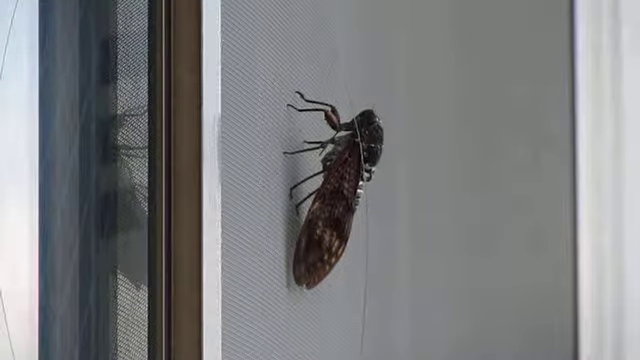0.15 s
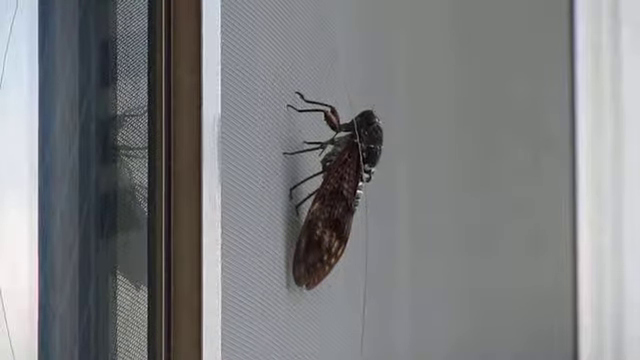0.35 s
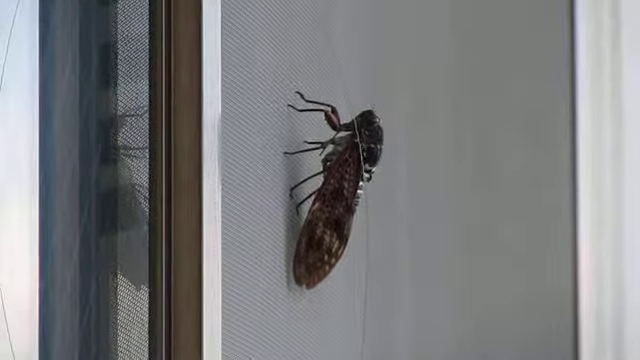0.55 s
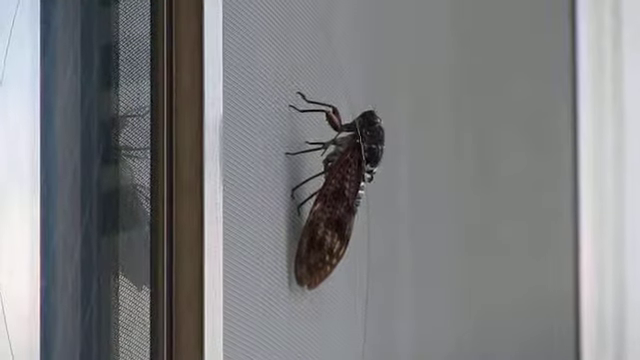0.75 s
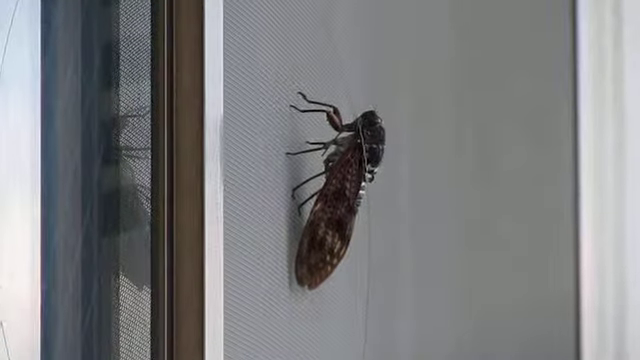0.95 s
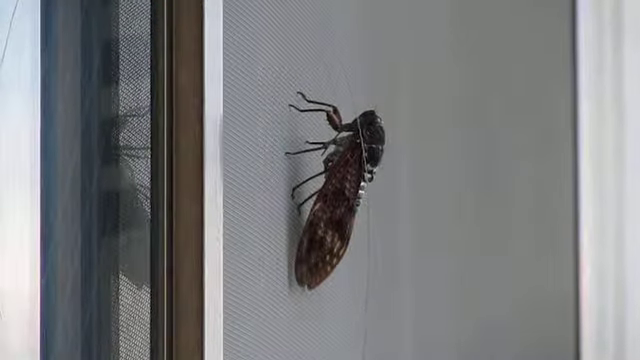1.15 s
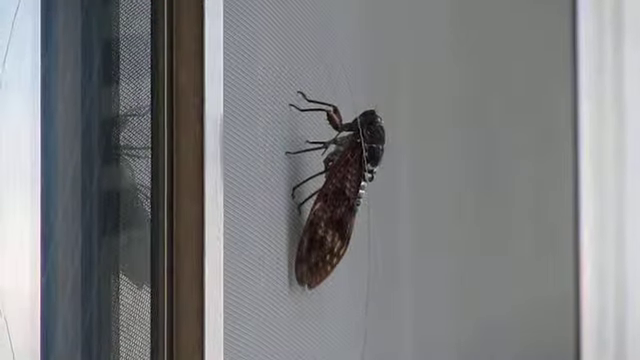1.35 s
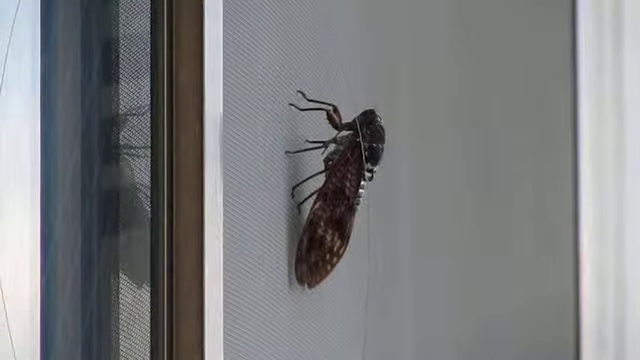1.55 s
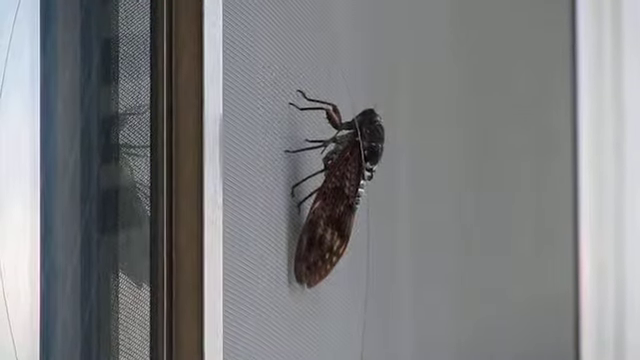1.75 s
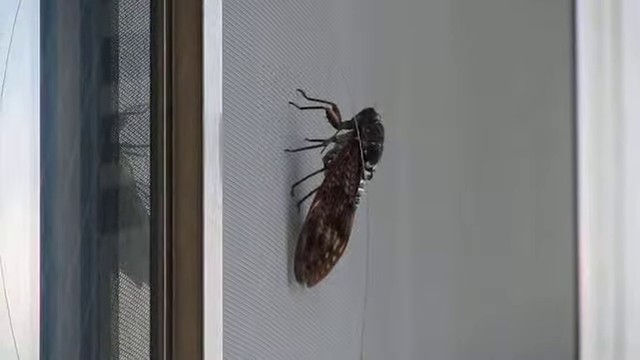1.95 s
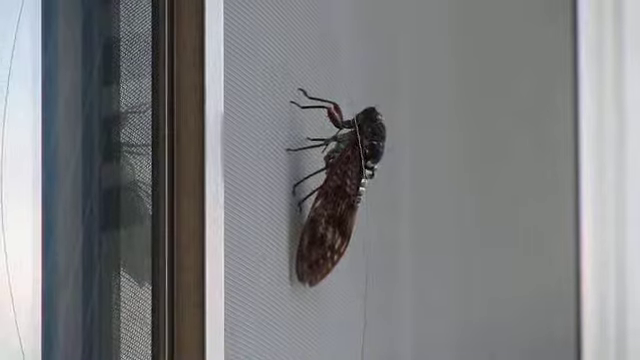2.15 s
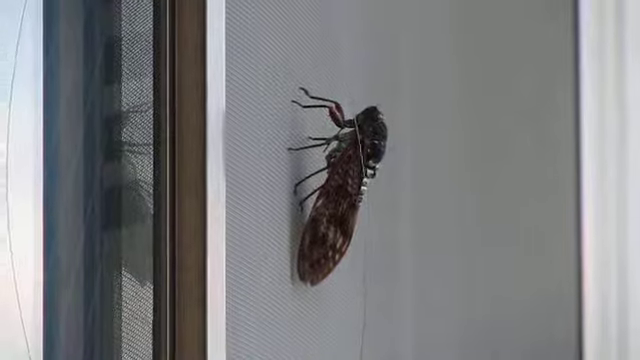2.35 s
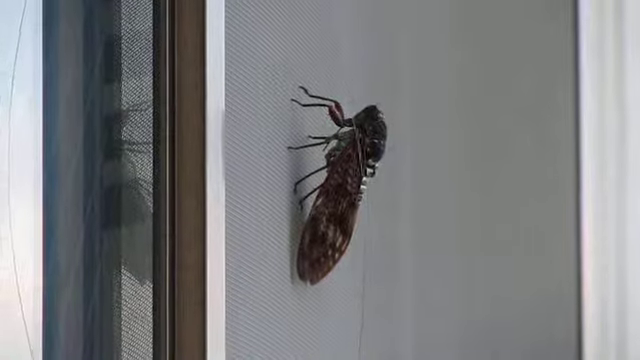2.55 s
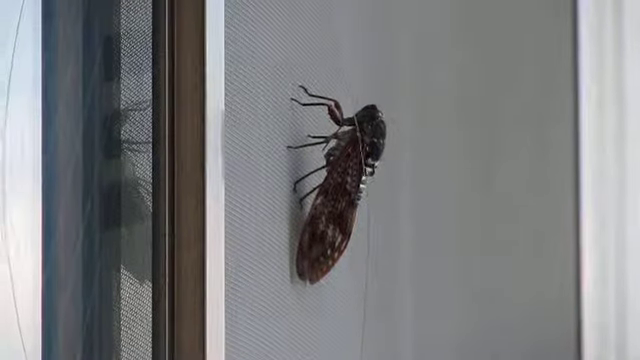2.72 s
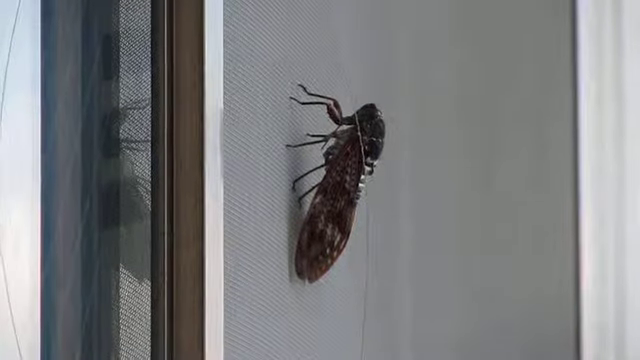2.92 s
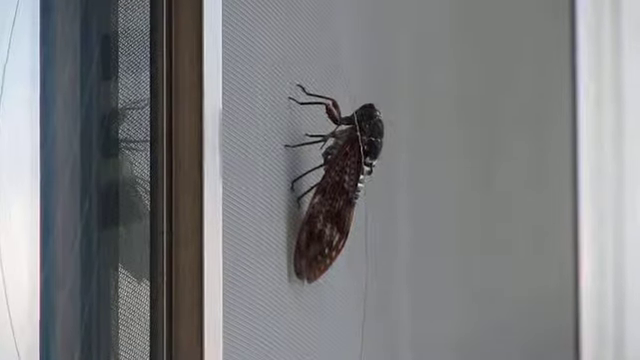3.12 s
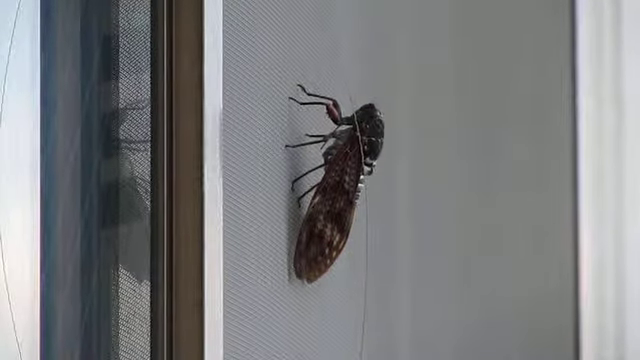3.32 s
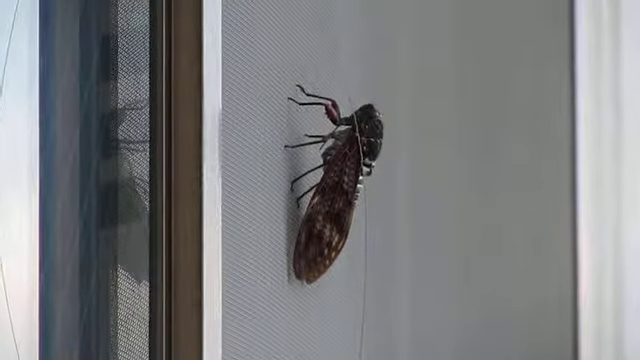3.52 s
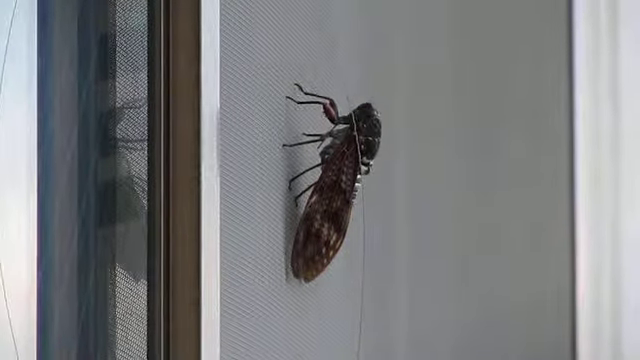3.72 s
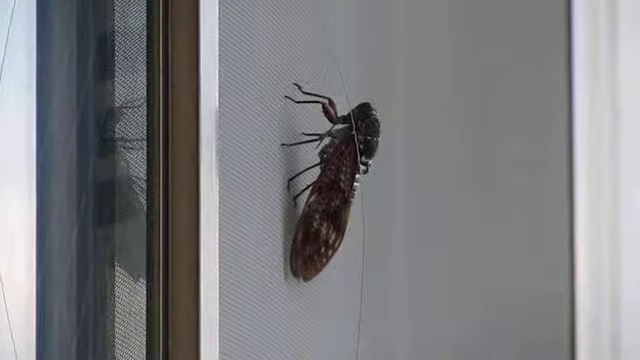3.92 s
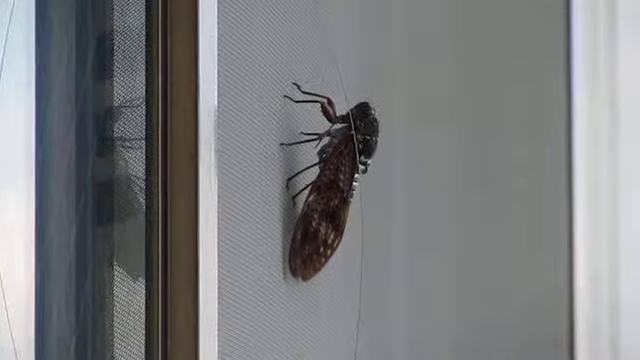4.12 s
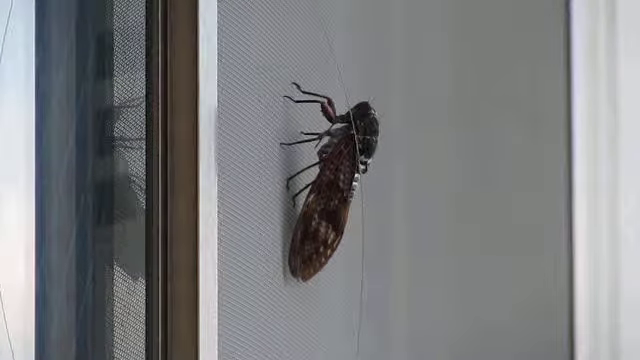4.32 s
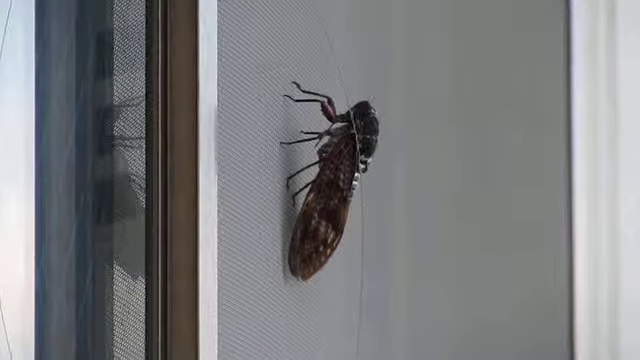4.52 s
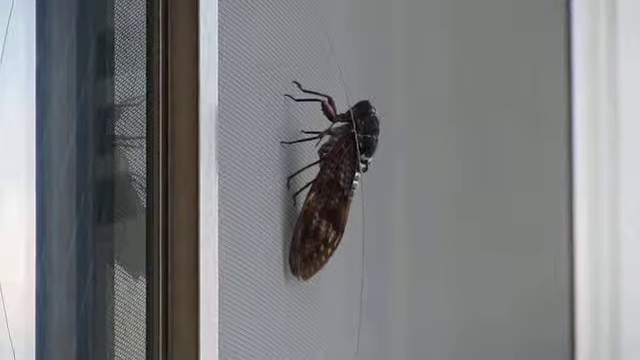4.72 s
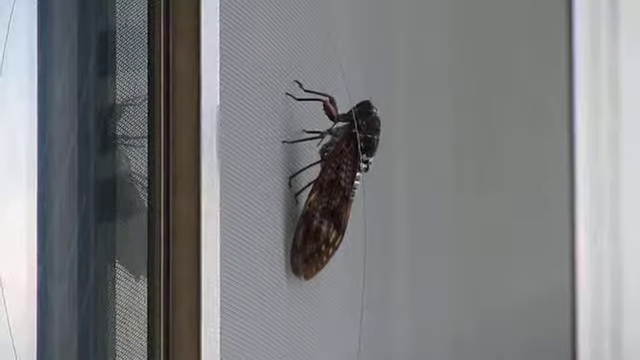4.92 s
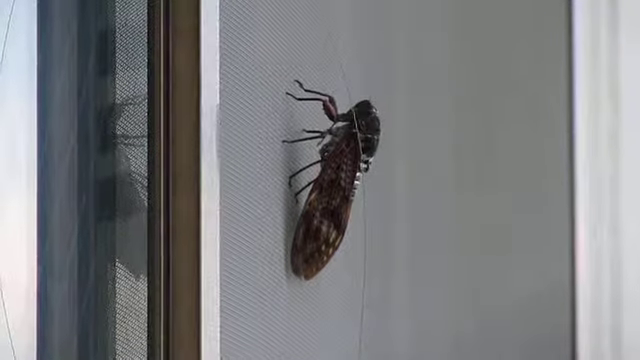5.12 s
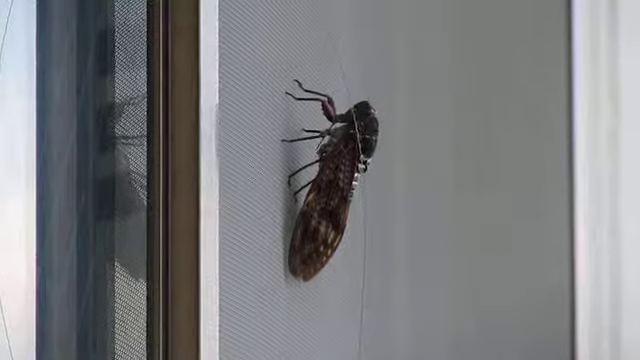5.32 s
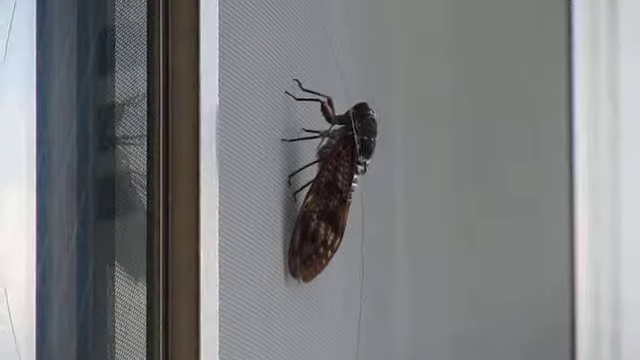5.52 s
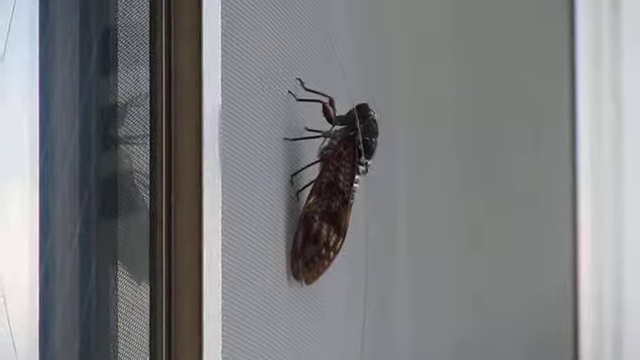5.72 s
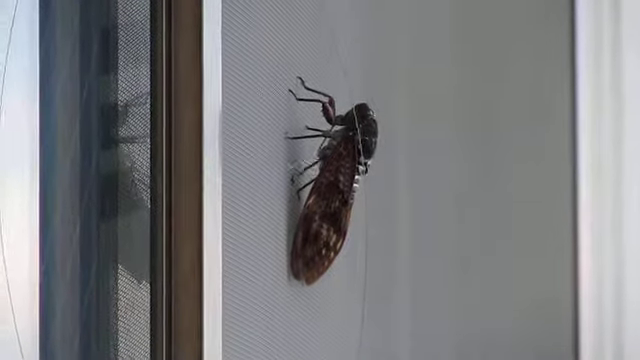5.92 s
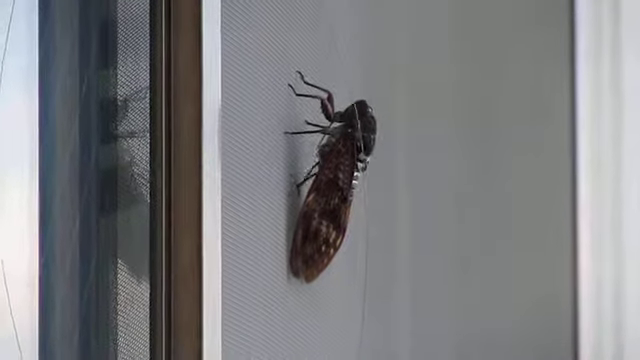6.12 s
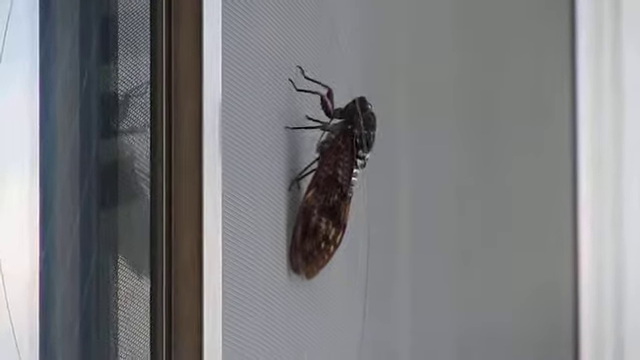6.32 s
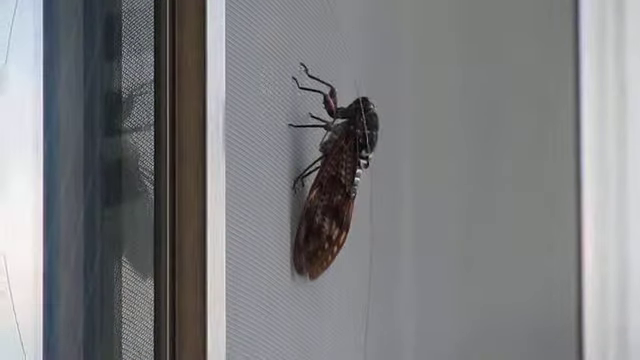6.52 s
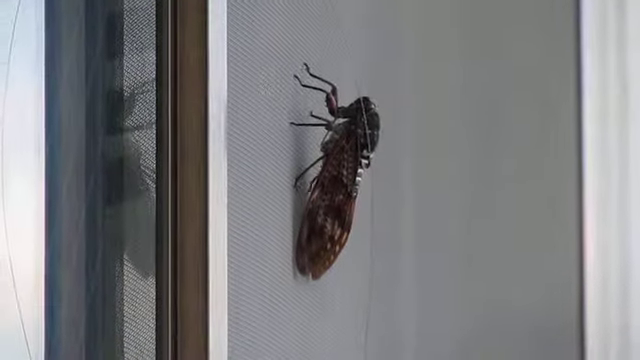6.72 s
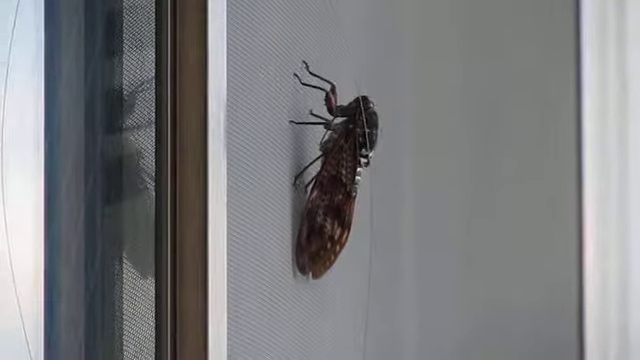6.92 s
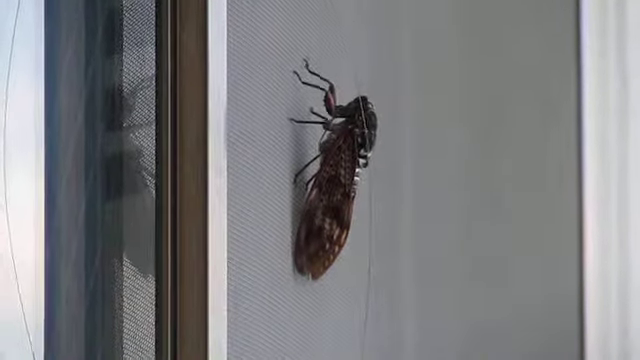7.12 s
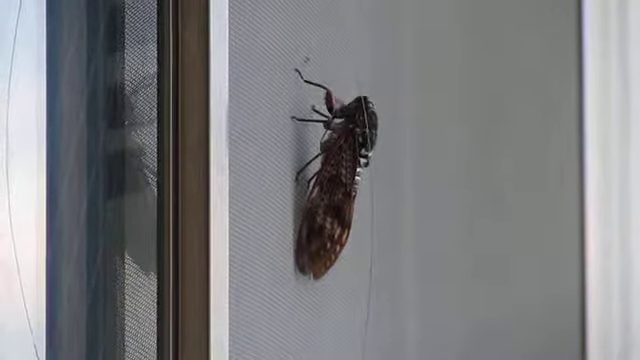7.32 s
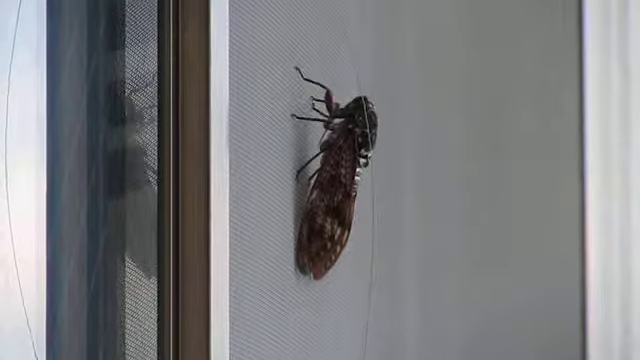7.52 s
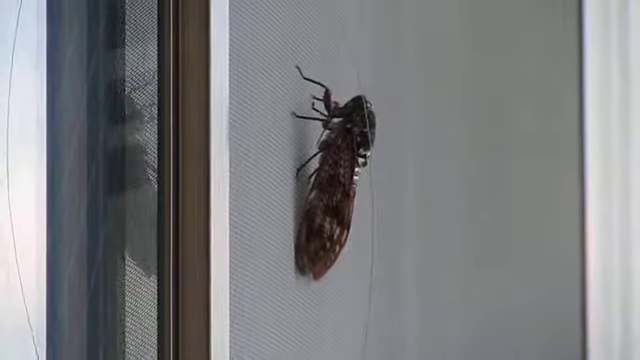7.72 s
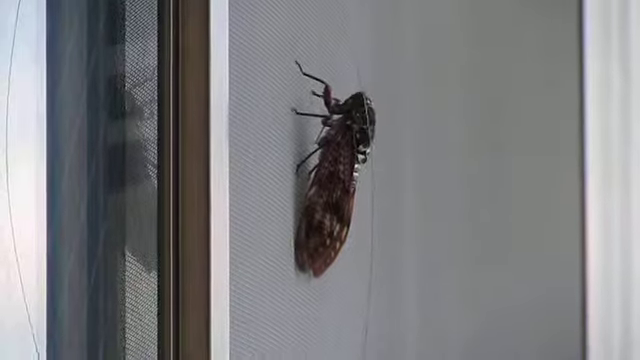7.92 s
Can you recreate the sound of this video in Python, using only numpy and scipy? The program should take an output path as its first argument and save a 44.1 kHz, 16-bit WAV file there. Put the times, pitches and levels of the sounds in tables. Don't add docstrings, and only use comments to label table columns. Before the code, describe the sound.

A cicada close by sings a dry, sizzling, rapidly pulsed buzz that gradually turns choppier and shorter over faint, distant traffic rumble.

```python
import sys
import numpy as np
from scipy import signal
from scipy.fft import rfft, irfft, next_fast_len
from scipy.io import wavfile
from scipy.ndimage import uniform_filter1d

SR = 44100
rng = np.random.default_rng(int(sys.argv[2]) if len(sys.argv) > 2 else 0)


def unload_audio(sound):
    columns = np.transpose(np.atleast_2d(sound))
    steps = np.round(np.clip(columns, -1, 1) * 32767)
    wavfile.write(sys.argv[1], SR, steps.astype(np.int16))


def ratio_of_db(decibels):
    return 10 ** (np.asarray(decibels, float) / 20)


N = 351036

# time_s, level_db
TRAFFIC_FLOW = [(0, -3), (.4, 0.3), (.95, -1.5), (1.5, 1.5), (2.3, .3), (3.3, .6), (4.1, -1), (4.9, 1.5),
                (5.05, -2), (6.7, -3), (7.96, -2)]
# frequency_hz, density_db_per_hz
THUD_SPECTRUM = [(12, -39), (20, -10), (130, -3), (170, -40), (290, -120)]
RUMBLE_SPECTRUM = [(76, -41), (130, -2.5), (220, 0.5), (440, -10.5), (570, -54), (970, -120)]
DRONE_SPECTRUM = [(260, -36), (450, -11), (534, 0.5), (614, -1.5), (694, -10), (780, -10), (1010, -25),
                  (1720, -120)]
HUM_SPECTRUM = [(440, -51), (750, -4.5), (1000, -2.5), (1100, -3), (1260, -6.5), (1900, -6.5), (2470, -15),
                (4180, -120)]
# frequency_hz, density_db_per_hz
HISS_SPECTRUM = [(900, -30), (1500, 0), (2400, -19), (3000, 15), (3800, -10), (4500, -3), (5600, -28),
                 (6800, -12), (8500, -28), (11000, -36), (12200, -50), (13000, -100)]
# level_db, share_of_flow_swing (0-1)
LAYER_LEVELS = [
    (-51.5, .2),
    (-44.5, 1.05),
    (-48.5, .1),
    (-55, .02),
    (-66.5, .02),
]
# centre_s, half_width_s, lift_db, layer_index
PASSES_BY = [
    (.05, .5, -4, 3),
    (3.3, .85, 5.8, 3),
    (3.3, .6, 3, 4),
    (1.4, .1, 3.5, 0),
    (1.66, .07, 5, 0),
    (2.9, .6, 2, 0),
    (6.95, .06, 8, 0),
    (7.35, .07, 6, 0),
]
# start_s, peak_db, pitch_hz
SOFT_KNOCK = [
    (5.0898, -27, 1250),
]
# time_s, level_db
WHISTLE_LEVEL = [
    (5.9, -66),
    (5.95, -55),
    (6.08, -57),
    (6.14, -63),
]
# centre_s, half_width_s, level_db, pitch_hz, slide_hz_per_s
FAR_PEEPS = [
    (2.75, .035, -55, 1000, 0),
    (4.3, .022, -57, 7600, -6000),
    (4.368, .01, -57, 7820, -6000),
    (4.415, .015, -54, 7400, -6000),
]
# delay_ms, gain
FRAME_ECHOES = [(.73, 0.15), (1.119, -0.14), (2.078, 0.065), (2.642, -0.0076), (3.058, -0.077),
                (3.352, 0.12), (4.441, -0.15), (4.76, -0.27)]
# pitch_hz, level_db
GLASS_MODES = [(4400, 1), (4512, 1), (4655, 1), (4780, -1), (4867, 2.5), (4964, 9.5), (5200, 1), (5290, 1),
               (5426, -0.5), (5551, 7), (5660, -3.5), (5780, -4.5), (5852, 5.5), (5935, 2.5), (6067, 0.5),
               (6180, 1.5), (6287, 5), (6400, -1), (6500, 3), (6585, -1), (6700, -2), (6830, 1),
               (7070, -11), (7350, 4.5)]
# centre_hz, width_hz, share_absorbed (0-1)
MESH_BANDS = [(2090, 130, .7), (2810, 120, .8), (3900, 250, .6), (5150, 110, .7)]
# frequency_hz, t60_s
PORCH_DECAY = [(2000, 0.066), (5300, 0.028), (8000, 0.029), (11000, 0.015)]
# first_s, last_s, count_bursts, growth_of_length_ms
BURST_RUNS = [(-.0059, .6174, 11, -4), (.6766, .8689, 4, -5), (.9253, 1.5446, 11, 0),
              (1.6108, 1.7306, 3, 1), (1.7964, 1.9796, 4, 5), (2.0475, 2.2885, 5, 4), (2.354, 2.79, 8, 2),
              (3.0113, 3.1862, 4, 5), (3.2483, 3.3079, 2, 6), (3.4904, 3.6602, 4, 5), (3.7213, 4.014, 6, 1),
              (4.1985, 4.3757, 4, -4), (4.5608, 4.6655, 3, 9), (4.8228, 4.8744, 2, 1),
              (4.9289, 5.2718, 7, 3), (5.326, 5.3814, 2, -2), (5.5436, 5.5952, 2, 10),
              (5.6552, 5.8197, 4, 5), (5.875, 5.9743, 3, 1.5), (6.1609, 6.4235, 6, 2.5),
              (6.4803, 6.6274, 4, 1.2), (6.8149, 7.0278, 5, 4), (7.0825, 7.2826, 5, .3),
              (7.4716, 7.5217, 2, .6), (7.5806, 7.8062, 5, -2), (7.86, 7.911, 2, 4)]
# start_s, length_ms, level_db, end_pitch_hz
SONG_BREAKS = [(2.8452, 6.8, -22, 5700), (2.864, 4.5, -23.5, 5700), (2.8904, 24.7, -22, 5800),
               (2.9346, 39.6, -20.5, 6120), (3.3669, 75, -21.5, 5850), (4.0503, 8.9, -22.5, 5600),
               (4.0789, 20.4, -20, 5770), (4.123, 7.2, -22.5, 5600), (4.1442, 9.4, -21, 5650),
               (4.407, 3.5, -21.5, 5610), (4.4414, 8.6, -20.5, 5700), (4.4927, 34, -21.5, 5720),
               (4.7083, 61, -22, 6170), (5.4084, 83.6, -22.5, 5690), (6.015, 11.4, -22, 5460),
               (6.038, 64, -21.5, 5910), (6.6693, 85, -22, 5720), (7.3203, 8.8, -25.5, 5670),
               (7.3426, 67, -22.5, 5920)]
# time_s, length_ms, level_db, end_pitch_hz
SONG_EFFORT = [(0, 30.5, -19, 6530), (.8, 27.5, -19.3, 6350), (1.6, 26, -20, 6200), (2.4, 23.5, -20, 5990),
               (3.2, 20.5, -20.6, 5820), (4.3, 17, -21.1, 5740), (4.9, 11.5, -21.6, 5590),
               (5.9, 10, -21.5, 5520), (7.1, 10.4, -22.3, 5440), (8, 10, -22, 5400)]
# time_s, right_tymbal_lag_ms, period_of_one_side_ms, rest_pitch_hz
MUSCLE_PACE = [(0, 3.48, 6.3, 5720), (1.5, 3.3, 6.13, 5790), (2.7, 4.3, 7.37, 5650), (3.8, 4.78, 8, 5370),
               (5, 5.25, 8.0, 5680), (6.5, 5.74, 8.4, 5442), (8, 4.94, 7.7, 5397)]
# pitch_over_rest_pitch (ratio), share_of_climb (0-1), level_db, t60_s, phase_rad
SAC_RINGS = [
    (.865, 0.41, -5, 0.0072, 0),
    (0.964, 0.56, -3.5, 0.0057, 0.094),
    (1.028, 1.02, -1, 0.0084, 2.436),
]
# pitch_hz, width_hz, level_db, sign
SHELL_MODES = [(2228, 128, -25.5, 0.94), (2487, 145, -21, -1.01), (2730, 110, -16, 0.76),
               (2930, 108, -18, -0.82), (3093, 100, -26.5, 0.48), (4540, 530, -21, 0.47),
               (6876, 830, -15.5, 0.95), (7165, 720, -18, -0.76), (9270, 3400, -25.5, 0.81),
               (10730, 3600, -26, -0.69)]
# frequency_hz, level_db
MICROPHONE_GAIN = [(1000, -17.5), (1900, -8.5), (2300, -1.5), (3700, -17), (4300, -13.5), (4700, -4),
                   (7500, -2), (11200, -15.5), (11900, -26.5), (12200, -35), (12500, -55)]

LONGER_HZ_PER_MS, LONGER_DB_PER_MS = 18, -.1
SCATTER_MS, SCATTER_DB, SCATTER_HZ = .5, .3, 30


def along(points, hz):
    f, value = np.transpose(points)
    return np.interp(np.log(hz + 1), np.log(f + 1), value)


def filtered(x, response):
    m = next_fast_len(N + 8192)
    return irfft(rfft(x, m) * response(np.fft.rfftfreq(m, 1 / SR)), m)[:N]


def mode(f, hz, width_hz):
    return 1j * f * width_hz / (hz * hz - f * f + 1j * f * width_hz)


def causal(points):
    def response(hz):
        cepstrum = irfft(np.log(ratio_of_db(along(points, hz))))
        cepstrum[1:len(hz) - 1] *= 2
        cepstrum[len(hz):] = 0
        return np.exp(rfft(cepstrum))
    return response


def place(s, size, shape, count):
    index = np.ceil(s * SR).astype(int)[:, None] + np.arange(count)
    wave = size[:, None] * shape(index / SR - s[:, None])
    inside = (index >= 0) & (index < N)
    return np.bincount(index[inside], wave[inside], N)


def rush(spectrum, patchy_db):
    z = signal.stft(rng.standard_normal(N), nperseg=512)[2]
    field = uniform_filter1d(rng.standard_normal(z.shape), 4, 0)
    field = uniform_filter1d(field, 12, 1)
    x = signal.istft(z * ratio_of_db(patchy_db * field / field.std()), nperseg=512)[1][:N]
    x = filtered(x, lambda hz: ratio_of_db(along(spectrum, hz)))
    return x / x.std()


def distance(t):
    flow_db = np.interp(t, *np.transpose(TRAFFIC_FLOW))
    levels_db = [db + share * flow_db for db, share in LAYER_LEVELS]
    for s, half_width, lift_db, layer in PASSES_BY:
        k = round(layer)
        levels_db[k] = levels_db[k] + lift_db * np.exp(-((t - s) / half_width) ** 2)
    spectra = (THUD_SPECTRUM, RUMBLE_SPECTRUM, DRONE_SPECTRUM, HUM_SPECTRUM)
    traffic = sum(ratio_of_db(db) * rush(colour, patchy_db=1.4) for db, colour in zip(levels_db, spectra))
    return traffic + ratio_of_db(levels_db[-1]) * rush(HISS_SPECTRUM, patchy_db=3.0)


def knock(t):
    (at, db, hz), = SOFT_KNOCK
    since = np.maximum(t - at, 0)
    rise = 1 - np.exp(-since / 0.00055)
    return ratio_of_db(db + 3 - 60 * since / 0.0072) * np.sin(2 * np.pi * hz * since) * rise


def whistle(t):
    return ratio_of_db(np.interp(t, *np.transpose(WHISTLE_LEVEL), -120, -120)) * np.sin(2 * np.pi * 1400 * t)


def peeps(t):
    total = 0
    for s, half_width, db, hz, slide in FAR_PEEPS:
        since = t - s
        tone = np.sin(2 * np.pi * (hz + slide * since / 2) * since)
        total = total + ratio_of_db(db) * np.exp(-(since / half_width) ** 2) * tone
    return total


def street():
    t = np.arange(N) / SR
    return distance(t) + knock(t) + whistle(t) + peeps(t)


def porch(x):
    def echoes(f):
        return 1 + sum(gain * np.exp(-2j * np.pi * f * ms / 1000) for ms, gain in FRAME_ECHOES)

    def glass(f):
        modes = enumerate(GLASS_MODES)
        return ratio_of_db(1.5) * sum((-1) ** k * ratio_of_db(db) * mode(f, hz, width_hz=50.4) for k, (hz, db) in modes)

    def mesh(f):
        return np.prod([1 - share * mode(f, hz, width) for hz, width, share in MESH_BANDS], axis=0)

    hz, t, z = signal.stft(rng.standard_normal(SR // 3), SR, nperseg=128)
    outside = 1 - 0.64 * (np.abs(hz - 5900) < 1500)
    short = outside[:, None] * ratio_of_db(-60 * t / along(PORCH_DECAY, hz)[:, None])
    long = ratio_of_db(-21 - 60 * t / .5)
    tail = signal.istft(z * (short + long), SR, nperseg=128)[1]
    far = signal.fftconvolve(np.pad(x, (200, 0)), tail / np.linalg.norm(tail))[:N]
    near = filtered(x, lambda f: (echoes(f) + glass(f)) * mesh(f))
    return near + ratio_of_db(-6.5) * far


def bursts():
    counts = [round(run[2]) for run in BURST_RUNS]
    along_run = np.concatenate([np.linspace(0, 1, n) for n in counts])
    first, last, growth = (np.repeat(c, counts) for c in np.transpose(BURST_RUNS)[[0, 1, 3]])
    start = first + (last - first) * along_run
    s, *effort = np.transpose(SONG_EFFORT)
    length, db, end_hz = (np.interp(start, s, c) for c in effort)
    chance = rng.standard_normal((len(start), 3)).T
    extra = growth * (along_run - .5) + SCATTER_MS * chance[0]
    steady = [start, length + extra, db + LONGER_DB_PER_MS * extra + SCATTER_DB * chance[1],
              end_hz + LONGER_HZ_PER_MS * extra + SCATTER_HZ * chance[2]]
    return np.hstack([steady, np.transpose(SONG_BREAKS)])


def clicks():
    start, length, db, end_hz = (c[:, None] for c in bursts())
    s, *pace = np.transpose(MUSCLE_PACE)
    lag, period, rest_hz = (np.interp(start, s, c) for c in pace)
    chance = rng.standard_normal((len(start), 3, 32))
    turn, side = np.arange(32) // 2, np.arange(32) % 2
    hurry = np.exp(-np.maximum(turn - 1.5, 0) / 2.52)
    step = 6.2 + (period - 6.2) * hurry
    left = np.cumsum(step * (turn > 0) * (1 - side), axis=1)
    ms = left + side * (step / 2 + (lag - period / 2) * hurry)
    ms = ms + 0.1154 * chance[:, 0] * (turn + side > 0)
    fade = 1 / (1 + np.exp(np.clip((ms - length - 1.5) / 1.2, -30, 30)))
    stretch = np.sin(2.24 * np.clip(ms / length, 0, 1.2) ** (1.17 + 0.022 * length))
    swell_db = 0.018 * length * stretch - 0.87 * side + 0.44 * (turn + side == 0)
    size = ratio_of_db(db + swell_db + 1.02 * chance[:, 1]) * fade
    climb_hz = 1.27 * (end_hz - rest_hz) * stretch + 40 * chance[:, 2]
    used = fade > .03
    return [(c + 0 * ms)[used] for c in (start + ms / 1000, side, size, rest_hz, climb_hz)]


def air_sac(s, size, rest_hz, climb_hz):
    def ring(t):
        total = 0
        for ratio, share, db, t60, phase in SAC_RINGS:
            hz = (ratio * rest_hz + share * climb_hz)[:, None]
            total = total + ratio_of_db(db - 60 * t / t60) * np.cos(2 * np.pi * hz * t - phase)
        return total
    return place(s, size, ring, count=330)


def shell(s, size, rest_hz):
    def snap(t):
        return np.sinc((t - 8 / SR) * SR * .8) * np.hanning(17)

    def thin(f):
        return (1j * f / (1j * f + 7000)) ** 2

    def body(f):
        return sum(sign * ratio_of_db(db) * mode(f, hz, width) for hz, width, db, sign in SHELL_MODES)

    size = size * ratio_of_db(-.008 * (rest_hz - 5542))
    late = rng.standard_normal((len(s), 2))
    ribs = place(s - 8 / SR, size, snap, count=17)
    second_size = size * ratio_of_db(1.5 + 1.2 * late[:, 1])
    second = place(s + .0016 + .00007 * late[:, 0], second_size, snap, count=17)
    return filtered(ribs + filtered(second, thin), body)


def tymbal(s, size, rest_hz, climb_hz):
    return ratio_of_db(7.5) * air_sac(s, size, rest_hz, climb_hz) + ratio_of_db(35.5) * shell(s, size, rest_hz)


def cicada():
    s, side, *stroke = clicks()
    return sum(porch(tymbal(*(c[side == k] for c in (s, *stroke)))) for k in range(2))


def scene():
    return (street() + filtered(cicada(), causal(MICROPHONE_GAIN)))[None]


def roll_off(x):
    return signal.sosfilt(signal.butter(12, 12230, fs=SR, output="sos"), x)


def record(dry):
    return roll_off(dry)


dry = scene()
out = record(dry)
unload_audio(out)
```